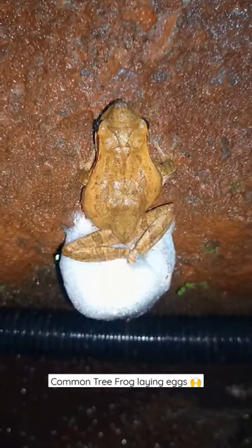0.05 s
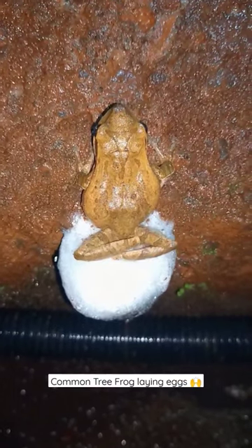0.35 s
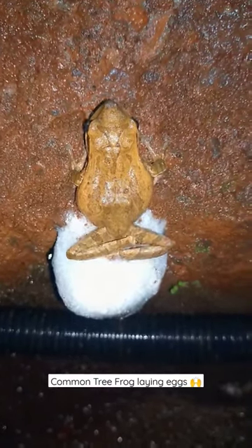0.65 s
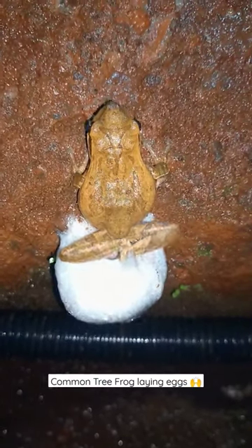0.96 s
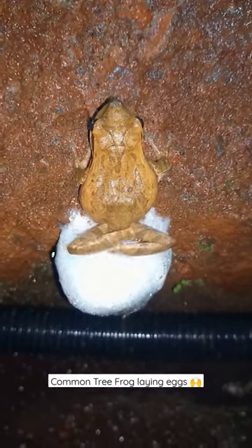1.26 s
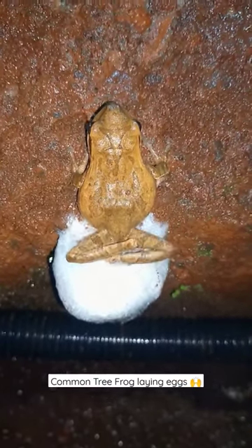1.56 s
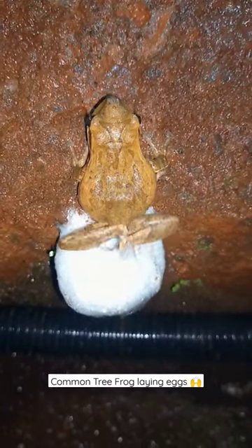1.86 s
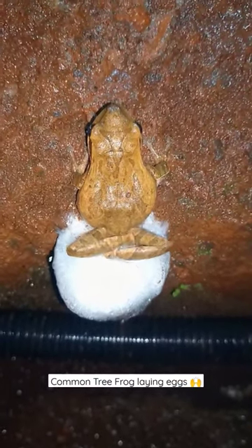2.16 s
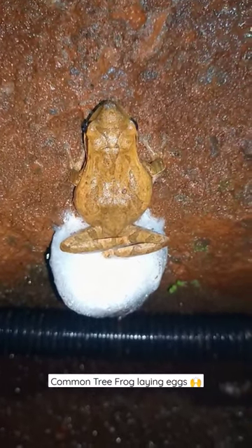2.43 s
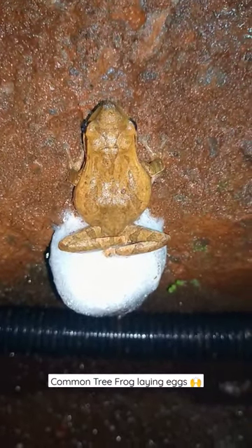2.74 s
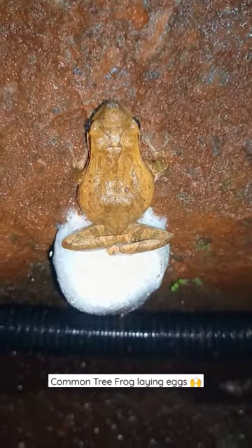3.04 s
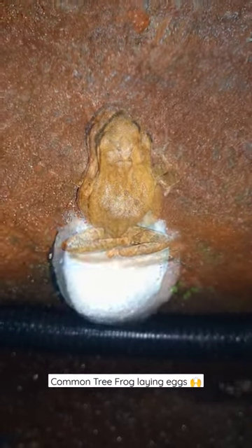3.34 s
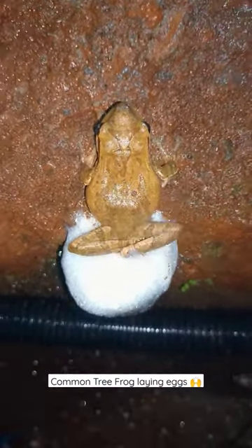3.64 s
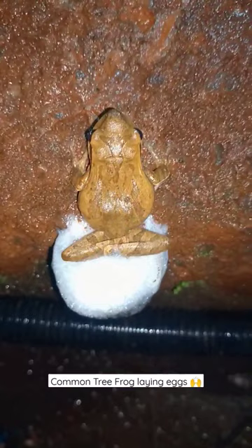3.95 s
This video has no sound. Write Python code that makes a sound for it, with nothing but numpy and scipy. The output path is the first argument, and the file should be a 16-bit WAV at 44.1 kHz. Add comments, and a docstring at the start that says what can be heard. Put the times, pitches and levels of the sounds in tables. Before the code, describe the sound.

Frogs call together in the night air, with fast pulsed croaks and clucks near the microphone and repeated bursts of high chirps. Behind them, distant frogs peep, purr and rattle, and crickets trill faintly.

```python
"""Frog chorus at night.

A near frog croaks about six times a second, pulsing its vocal sac, with clucks between; a second gives
runs of sharp arched chirps. Farther frogs peep, hoot, purr and rattle in waves, and many small voices
merge into a wash. Two crickets trill with their wings over faint buzzes, insect hiss and low rumble.
A few wet ticks and two dull drips fall in between."""
import sys
import numpy as np
from scipy import signal
from scipy.fft import rfft, irfft, next_fast_len
from scipy.io import wavfile
from scipy.ndimage import uniform_filter1d, map_coordinates

SR = 44100
rng = np.random.default_rng(int(sys.argv[2]) if len(sys.argv) > 2 else 0)


def inscribe(sig):
    """Save sig as 16-bit PCM at rate SR to the path in sys.argv[1].

    A 1-D sig is mono; a 2-D sig holds one channel per row.
    Samples are clipped to [-1, 1] before scaling.
    """
    pcm = np.round(np.clip(np.atleast_2d(sig).T, -1, 1) * 32767)
    wavfile.write(sys.argv[1], SR, pcm.astype(np.int16))


N = 176400
T = np.arange(N) / SR
NOTE_T = np.arange(-SR // 25, SR // 25) / SR  # seconds from the centre of one short sound


def amp(db):
    """Decibels to gain."""
    return 10 ** (np.asarray(db) / 20)


def unit(x):
    """x at rms 1."""
    return x / np.sqrt(np.mean(x ** 2) + 1e-20)


def gain_at(spectrum, hz):
    """Gain from (Hz, dB) points on a log frequency axis."""
    points_hz, db = np.transpose(spectrum)
    return amp(np.interp(np.log(np.abs(hz) + 1), np.log(points_hz), db))


def level(points):
    """Gain per sample from (s, dB) points."""
    return amp(np.interp(T, *np.transpose(points)))


def bell(t, width):
    """Gaussian bump around t = 0."""
    return np.exp(-(t / width) ** 2)


def phase(hz):
    """Running phase of a pitch curve, from a random start."""
    return 2 * np.pi * (np.cumsum(hz) / SR + rng.random())


def wobble(knots_per_s):
    """Smooth random curve over the scene."""
    return map_coordinates(rng.standard_normal(4096), [T * knots_per_s], mode="wrap")


def flutter(knots_per_s):
    """Smooth random curve over one note."""
    return map_coordinates(rng.standard_normal(512), [(NOTE_T - NOTE_T[0]) * knots_per_s], mode="wrap")


def pulsing(rate_hz, sharpness, drift):
    """Pulsing gain of rms 1 at a slightly unsteady rate."""
    return unit(np.exp(sharpness * np.cos(phase(rate_hz * (1 + drift * wobble(12))))))


def filtered(x, response):
    """x through a gain given as a function of Hz."""
    size = next_fast_len(N + SR // 2)
    return irfft(rfft(x, size) * response(np.fft.rfftfreq(size, 1 / SR)), size)[:N]


def coloured(x, spectrum):
    """x shaped by (Hz, dB) points, at rms 1."""
    return unit(filtered(x, lambda hz: gain_at(spectrum, hz)))


def add(track, centre_s, sound):
    """Mix in a short sound centred on centre_s."""
    i = round(centre_s * SR) - len(sound) // 2 + np.arange(len(sound))
    inside = (i >= 0) & (i < N)
    track[i[inside]] += sound[inside]


# Rumble and hiss spectra. Each row: frequency in Hz, relative level in dB.
RUMBLE_SPECTRUM = [(25, -17), (45, 1.5), (100, 1.5), (300, -11.5), (400, -9.5), (600, -2.5), (740, -9.5),
                   (1000, -14.5), (2000, -8.5), (4000, -41.5)]
HISS_SPECTRUM = [(3000, -26), (4800, -7), (5700, 3.5), (7600, -1), (8600, 6.5), (9600, 1.5), (10300, -12.5),
                 (15500, -15.5)]


def night_air(rumble_db=-44, hiss_db=-55):
    """Low rumble and the even hiss of distant insects."""
    rumble = coloured(rng.standard_normal(N), RUMBLE_SPECTRUM)
    hiss = coloured(rng.standard_normal(N), HISS_SPECTRUM)
    return amp(rumble_db) * rumble + amp(hiss_db) * hiss


# Each row: centre in seconds, level in dB, pitch in Hz.
BUZZES = [(1.39, -50, 5720), (2.455, -52, 5920), (2.53, -52, 5600), (3.79, -49, 5750), (3.92, -53, 6050)]


def buzzes(width_s=0.041, waver_hz=110):
    """Faint, high, pulsing buzzes within the chorus."""
    pulses = pulsing(rate_hz=116, sharpness=0.39, drift=0.071)
    waver = waver_hz * wobble(600)
    return sum(amp(db) * bell(T - s, width_s) * pulses * np.sin(phase(hz + waver))
               for s, db, hz in BUZZES)


def stridulation(hz, waver_hz, overtone_db):
    """A cricket's wing tone, pulsed by the strokes."""
    angle = phase(hz + waver_hz * wobble(700))
    strokes = pulsing(rate_hz=104, sharpness=0.7, drift=0.03)
    return unit(strokes * (np.sin(angle) + amp(overtone_db) * np.sin(2 * angle)))


def trill_gates(first_s, period_s, length_s, count):
    """Evenly spaced, soft-edged gates."""
    starts = first_s + period_s * np.arange(count)
    return sum(np.exp(-(2 * (T - s) / length_s - 1) ** 8) for s in starts)


# Near cricket's loudness curve. Each row: time in seconds, level in dB.
CRICKET_LEVELS = [(0, -48), (2.2, -53), (3.45, -55), (3.8, -52)]


def crickets(far_db=-56.5):
    """One cricket trills about five times a second; a farther, higher one drifts in and out of step."""
    far_gate = trill_gates(first_s=0.1285, period_s=0.189, length_s=0.097, count=21)
    near_gate = trill_gates(first_s=-0.082, period_s=0.2045, length_s=0.1, count=20)
    far = far_gate * stridulation(hz=7330, waver_hz=140, overtone_db=-20)
    near = near_gate * stridulation(hz=6995, waver_hz=85, overtone_db=-27)
    return level(CRICKET_LEVELS) * near + amp(far_db) * far


# Each row: frequency in Hz, relative level in dB.
WASH_SPECTRUM = [(900, -24), (1100, -5), (1300, 3), (1600, -5), (1870, 3), (2100, -2), (2550, -4.5),
                 (3600, -2.5), (4200, -0.5), (4450, -8), (4850, -27), (5500, -61.5)]


def chorus_wash(level_db=-32, patch_db=2.7):
    """Distant frogs merge into noise, patchy in time and frequency."""
    noise = rng.standard_normal(N) * amp(0.72 * wobble(110))
    spectrogram = signal.stft(noise, nperseg=512)[2]
    patches = uniform_filter1d(rng.standard_normal(spectrogram.shape), size=6, axis=0)
    patches = unit(uniform_filter1d(patches, size=7, axis=1))
    patchy_noise = signal.istft(spectrogram * amp(patch_db * patches), nperseg=512)[1][:N]
    return amp(level_db) * coloured(patchy_noise, WASH_SPECTRUM)


# Each row: frequency in Hz, relative level in dB.
PURR_SPECTRUM = [(2600, -30.5), (3000, 0), (3200, 0), (3450, -1), (3800, -56.5)]
# Each row: time in seconds, level in dB.
PURR_LEVELS = [(0, -37.5), (2.5, -41.5), (3.6, -43.5), (4, -60)]


def purring_frogs(pitch_hz=3250):
    """A fading, purring trill: a pulsed note in a narrow band of noise."""
    pulses = pulsing(rate_hz=68.4, sharpness=1.8, drift=0.025)
    flicker = amp(1.6 * wobble(70))
    note = unit(pulses * flicker * np.sin(phase(pitch_hz + 90 * wobble(150))))
    envelope = level(PURR_LEVELS) * amp(1.1 * wobble(14))
    noise = amp(-1) * coloured(rng.standard_normal(N), PURR_SPECTRUM)
    return envelope * (noise + note)


# Each row: centre in seconds, relative level in dB.
RATTLE_WAVES = [(1.37, -36.5), (1.68, -37.5), (1.91, -35.5), (2.125, -30), (2.26, -36.5), (2.459, -33),
                (2.611, -30.5), (2.83, -29.5), (2.999, -35), (3.13, -29.5), (3.339, -28.5), (3.531, -29.5),
                (3.722, -29), (3.909, -31.5)]
# Each row: frequency in Hz, relative level in dB.
RATTLE_SPECTRUM = [(3000, -31), (3600, -4.5), (3830, 3), (4400, -8.5), (4800, -25), (5500, -78)]


def rattling_frogs(pitch_hz=3860, width_s=0.045, gain_db=-2):
    """Far rattles swell in waves, note and noise sharing one fast pulse."""
    waves = sum(amp(db) * bell(T - s, width_s) for s, db in RATTLE_WAVES)
    pulses = pulsing(rate_hz=221.4, sharpness=0.49, drift=0.0199)
    note = pulses * np.sin(phase(pitch_hz + 35 * wobble(25) + 30 * wobble(300)))
    noise = coloured(rng.standard_normal(N) * pulses, RATTLE_SPECTRUM)
    return amp(gain_db) * waves * (noise + note)


# Each entry: centre of a hoot in seconds.
HOOT_TIMES_S = [.3, .395, .56, .7, .93, 1.046, 1.111, 1.273, 1.92, 2.203, 2.34, 2.6, 2.717, 2.875, 2.96,
                3.08, 3.145, 3.245, 3.293, 3.425, 3.575]


def hooting_frogs(deep_hz=1168, high_hz=1308, deep_until_s=1, start_db=-30, growth_db_per_s=1):
    """Two distant frogs call ever louder, the deeper one first, their pulses smeared into hoots."""
    out = np.zeros(N)
    for s in HOOT_TIMES_S:
        hz = deep_hz if s < deep_until_s else high_hz
        envelope = bell(NOTE_T, 0.015) * (1 + 0.35 * flutter(145))
        tone = np.sin(phase(hz + 20 * flutter(148)))
        add(out, s, amp(start_db + growth_db_per_s * s) * envelope * tone)
    return out


def peep(hz, width_s, glide_hz_per_s, rasp):
    """A short gliding note, clean at rasp 0, rough at 1."""
    envelope = bell(NOTE_T, width_s) * (1 + 0.43 * rasp * flutter(710))
    return envelope * np.sin(phase(hz + glide_hz_per_s * NOTE_T + rasp * 240 * flutter(909)))


# Each row: centre in seconds, level in dB, pitch in Hz, glide in Hz per second.
PEEPS = [(.082, -24, 2307, 15000), (.274, -22.5, 2440, 40000), (.364, -23.5, 2320, -8000),
         (.472, -25, 2200, 9000), (0.571, -26, 2180, 2997), (.683, -20, 2270, 37997), (0.785, -25, 2000, 0),
         (1.029, -22, 2260, 58000), (1.133, -26, 2000, 30000), (1.229, -23.5, 2980, -30000)]


def peeping_frogs(count=52, crowd_db=-29, low_hz=1750, high_hz=3200, glide_hz_per_s=25000, width_s=0.0066):
    """Farther frogs: quick clean glides, slower and longer rasps, and a random crowd of fainter peeps."""
    out = np.zeros(N)
    for s, db, hz, glide in PEEPS:
        rasp = bell(glide, glide_hz_per_s)
        add(out, s, amp(db) * peep(hz, width_s * (1 + rasp), glide, rasp))
    for slot, (offset, height, loudness, slope) in enumerate(rng.random((count, 4))):
        hz = low_hz + height * (high_hz - low_hz)
        note = peep(hz, width_s, glide_hz_per_s * (2 * slope - 1), rasp=0.3)
        add(out, (slot + offset) / count * N / SR, amp(crowd_db + 10 * (loudness - 1)) * note)
    return out


# Each row: centre in seconds, level in dB.
TICKS = [(.25, -49.5), (.32, -49), (.885, -53.5), (1.544, -45), (1.649, -52)]


def wet_ticks(width_s=0.0007):
    """Faint, bright, wet ticks close by."""
    out = np.zeros(N)
    for s, db in TICKS:
        add(out, s, amp(db) * bell(NOTE_T, width_s) * rng.standard_normal(len(NOTE_T)))
    return out


# Each row: centre in seconds, pitch in Hz, level in dB.
DRIPS = [(.835, 333, -37), (1.969, 893, -28)]


def drips(ring_s=0.0022, rise_hz_per_s=40000, jitter_hz=240):
    """Soft, dull drips, each rising in pitch."""
    out = np.zeros(N)
    for s, hz, db in DRIPS:
        pitch_hz = hz + rise_hz_per_s * NOTE_T + jitter_hz * flutter(497)
        add(out, s, amp(db) * bell(NOTE_T, ring_s) * np.sin(phase(pitch_hz)))
    return out


# Each row: loudest moment in seconds, relative level in dB, pitch at that moment in Hz,
# pitch at the top of the arch in Hz, swell in seconds, rasp at the top in dB re the burst.
CHIRPS = [(.0074, -11, 2950, 3450, .001, -17), (.065, -9.5, 2765, 3330, 0.0019, -19),
          (0.127, -10, 2730, 2950, 0.0034, -19), (0.1903, -9, 2710, 2930, 0.0041, -13),
          (.255, -10.5, 2710, 2900, 0.0043, -9), (0.7228, -11, 2570, 2700, 0.0041, -15),
          (.785, -10.5, 2600, 2680, 0.0061, -21), (.852, -10.5, 2570, 2480, 0.006, -18),
          (1.2874, -13, 2590, 3200, 0.0044, -14), (1.343, -13.5, 2740, 3200, 0.0017, -12),
          (1.4049, -11, 2720, 2930, 0.0032, -7.5), (1.47, -10, 2705, 2930, 0.004, -10.5),
          (1.7305, -10.5, 2560, 2700, 0.0044, -17), (1.793, -10, 2570, 2630, 0.0048, -14),
          (1.862, -11, 2500, 2544, 0.0081, -19), (2.443, -19, 2830, 3020, 0.005, -15),
          (2.4965, -18, 2750, 2880, 0.0055, -14), (2.5548, -16.5, 2714, 2780, 0.0056, -10),
          (2.613, -18.5, 2700, 2780, 0.0058, -10), (2.6776, -16.5, 2630, 2700, 0.0085, -12),
          (3.001, -16.5, 2510, 3100, .003, -16), (3.054, -14, 2730, 3250, .0021, -13),
          (3.115, -12.5, 2640, 2950, .0025, -10), (3.182, -12, 2650, 2850, 0.004, -12),
          (3.7772, -14.5, 2750, 2920, 0.0036, -14), (3.834, -11.5, 2620, 2760, 0.0047, -11.5),
          (3.894, -12.5, 2632, 2680, 0.0062, -17), (3.956, -13.5, 2595, 2650, 0.007, -16)]
# Each row: frequency of the second harmonic in Hz, its level in dB re the burst.
CHIRP_OVERTONE = [(5000, -39.5), (5500, -33.5), (5900, -30), (6600, -22.5), (7000, -5)]


def chirping_frog(gain_db=-1, rise_hz=505, rise_s=0.0098, fall_s=0.0095, stop_s=0.0023):
    """Each note rises softly, rasps atop its arch, bursts out as it falls and plunges as it stops."""
    out = np.zeros(N)
    from_top_s = NOTE_T + fall_s
    plunge_hz = 250 * (np.maximum(NOTE_T, 0) / 0.0035) ** 2
    lead_in = bell(from_top_s, 0.0025) + amp(-8) * bell(from_top_s + rise_s / 2, rise_s)
    overtone_envelope = bell(from_top_s - 0.0029, 0.011)
    for s, db, hz, top_hz, swell_s, rasp_db in CHIRPS:
        rising_hz = top_hz - rise_hz * (from_top_s / rise_s) ** 2
        falling_hz = top_hz - (top_hz - hz) * (from_top_s / fall_s) ** 2 - plunge_hz
        pitch_hz = np.maximum(np.where(from_top_s < 0, rising_hz, falling_hz), 1300)
        burst = bell(NOTE_T, np.where(NOTE_T < 0, swell_s, stop_s))
        angle = phase(pitch_hz + 130 * (1 - burst) * flutter(695))  # steadiest when loudest
        rasp = 1 + 0.31 * flutter(600)
        envelope = burst * (1 + 0.08 * flutter(901)) + amp(rasp_db) * lead_in * rasp
        second = gain_at(CHIRP_OVERTONE, 2 * pitch_hz) * np.sin(2 * angle)
        fourth = amp(-48) * np.clip((top_hz - 2700) / 300, 0, 1.5) * np.sin(4 * angle)
        note = envelope * np.sin(angle) + overtone_envelope * rasp * (second + fourth)
        add(out, s, amp(db + gain_db) * note)
    return out


def sac_pulse(hold, sac_hz=1219, lift_hz=256.3, settle_s=0.0019, attack_s=0.0024, ring_s=0.0029):
    """A pulse starts sharp and settles on the vocal sac's note; hold is the gain of a drawn-out end."""
    t = np.maximum(NOTE_T + attack_s, 0)
    onset = 1 - bell(t, 0.7 * attack_s)
    knock = onset * np.exp(-(t / ring_s) ** 1.07)
    held_end = hold * onset * bell(t - 0.0086, 0.0091)
    envelope = np.hypot(knock / knock.max(), held_end)
    angle = phase(sac_hz * (1 + rng.normal(0, 0.0088)) + lift_hz * np.exp(-t / settle_s))
    return amp(rng.normal(0, 1)) * envelope * np.sin(angle)


# Each row: first pulse in seconds, pulse gap in seconds, relative level in dB,
# held end in dB re the pulses.
CROAKS = [(.0093, 0.0075, -16.5, -3.5), (0.1414, .0071, -15, -7), (.347, .0083, -17, -11),
          (0.4983, 0.0074, -16, -1.5), (.649, 0.008, -15, -4), (0.8266, 0.0082, -16.5, -3.5),
          (0.982, 0.0072, -16.5, -2), (1.1422, 0.0076, -15, -3.5), (1.3191, 0.0082, -15, -4.5),
          (1.497, 0.0074, -16, -3.5), (1.6749, 0.0086, -14, -3), (1.8513, 0.0046, -22.5, 4.5),
          (2.1324, 0.0073, -15, 0), (2.2796, 0.0069, -16, -0.5), (2.4709, 0.0064, -15.5, -4.5),
          (2.654, .0064, -15.5, -4.5), (2.816, 0.0058, -15, 0.5), (3.026, 0.0074, -14, -7),
          (3.1844, .0069, -19, .5), (3.3518, 0.0063, -16, -2.5), (3.5134, 0.0066, -15.5, -1),
          (3.6869, 0.0081, -16.5, .5), (3.8529, 0.0078, -17, -1.5)]
# Each row: first pulse in seconds, pulse count, relative level in dB.
CLUCKS = [(0.095, 2, -19.5), (0.1242, 1, -21), (.324, 2, -20.5), (0.438, 2, -17), (0.4652, 1, -18),
          (0.4822, 1, -16.5), (0.587, 2, -17.5), (0.6341, 1, -20), (0.742, 2, -20), (0.9191, 2, -19.5),
          (1.0783, 2, -18.5), (1.2342, 2, -17.5), (1.304, 1, -17.5), (1.4142, 1, -18.5), (1.48, 1, -17.5),
          (1.5914, 2, -19), (1.6601, 1, -17), (1.7715, 2, -19.5), (1.8194, 1, -22.5), (2.027, 1, -20),
          (2.0524, 1, -19.5), (2.1111, 2, -16.5), (2.2241, 1, -17), (2.264, 1, -17), (2.3751, 2, -19.5),
          (2.448, 1, -16), (2.565, 2, -18.5), (2.6319, 2, -17), (2.744, 1, -20), (2.9125, 2, -19),
          (2.9882, 1, -18), (3.005, 2, -16), (3.118, 2, -19.5), (3.1665, 1, -17), (3.2814, 1, -21.5),
          (3.4493, 2, -17.5), (3.6045, 2, -21.5), (3.6727, 2, -17), (3.781, 2, -19.5), (3.9495, 2, -19.5)]


def croaking_frog(gain_db=1, cluck_gap_s=0.0085):
    """Croaks of three sac pulses, the last one held, with single or double clucks between."""
    out = np.zeros(N)
    for s, gap_s, db, hold_db in CROAKS:
        for k, hold in enumerate((0, 0, amp(hold_db))):
            add(out, s + k * gap_s, amp(db) * sac_pulse(hold))
    for s, count, db in CLUCKS:
        for k in range(round(count)):
            add(out, s + k * cluck_gap_s, amp(db) * sac_pulse(hold=0))
    return amp(gain_db) * out


def echo(x, level_db=-16, t60_s=0.2):
    """Short scatter from walls and plants."""
    t = np.arange(SR // 2) / SR
    tail = rng.standard_normal(len(t)) * amp(-60 * t / t60_s)
    return amp(level_db) * signal.fftconvolve(x, tail / np.linalg.norm(tail))[:N]


def scene():
    """Single calls and drips with their echo, in front of the chorus and insects; mono."""
    front = croaking_frog() + chirping_frog() + peeping_frogs() + hooting_frogs() + drips()
    scatter = echo(front)
    chorus = rattling_frogs() + purring_frogs() + chorus_wash() + buzzes()
    return (front + scatter + chorus + crickets() + wet_ticks() + night_air())[None]


def record(dry, top_hz=15600):
    """The microphone keeps nothing above its band limit."""
    return filtered(dry[0], lambda hz: hz < top_hz)[None]


dry = scene()
out = record(dry)
inscribe(out)
```